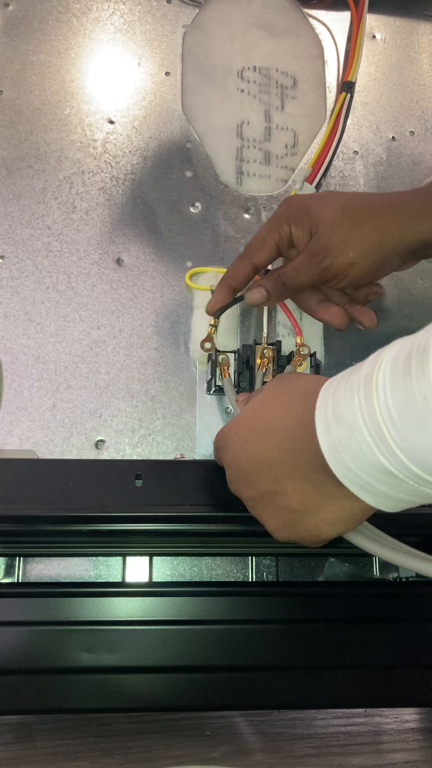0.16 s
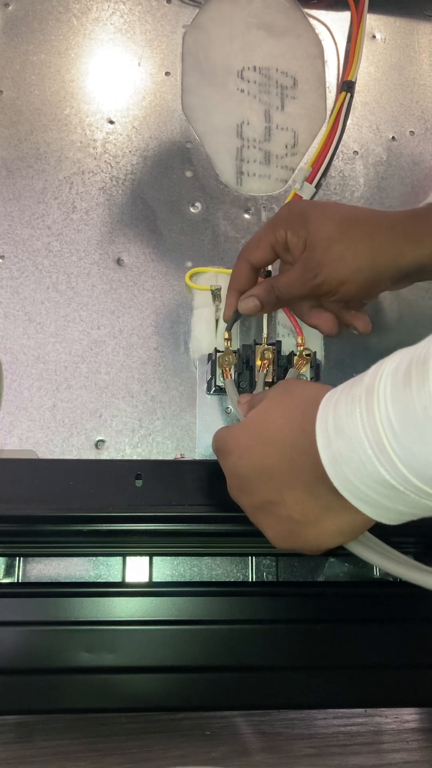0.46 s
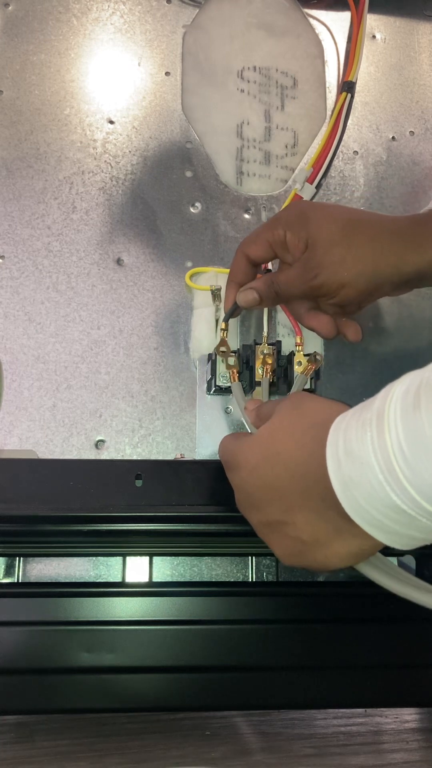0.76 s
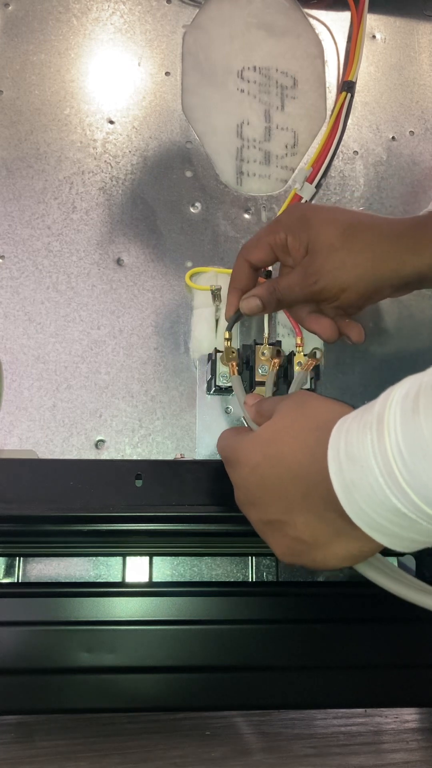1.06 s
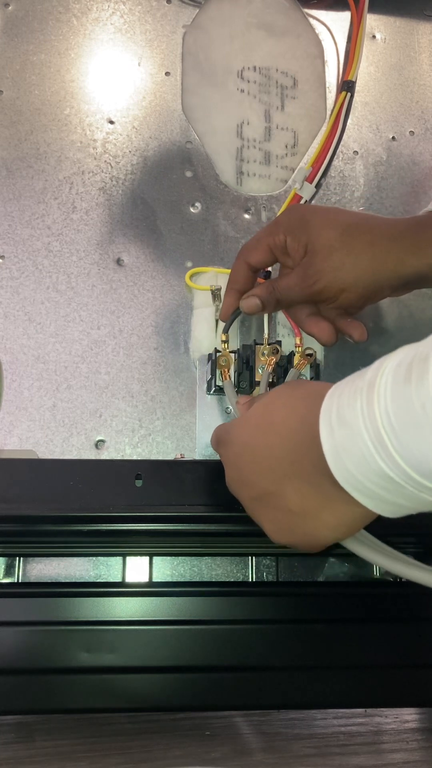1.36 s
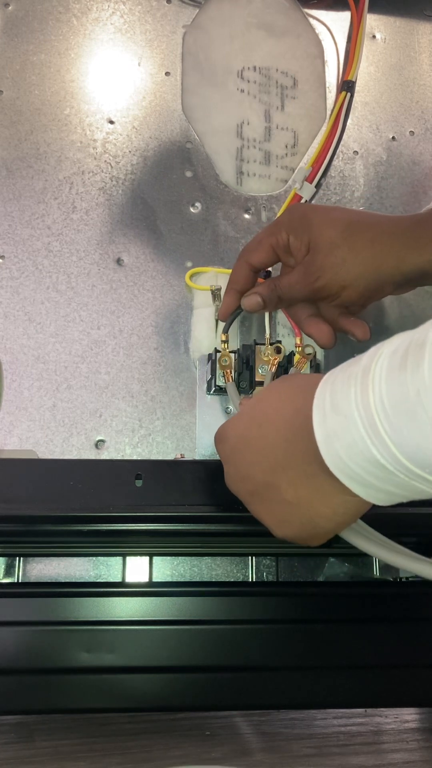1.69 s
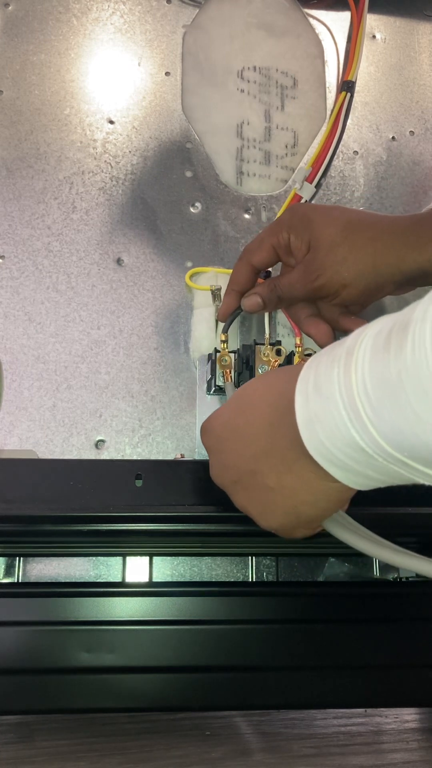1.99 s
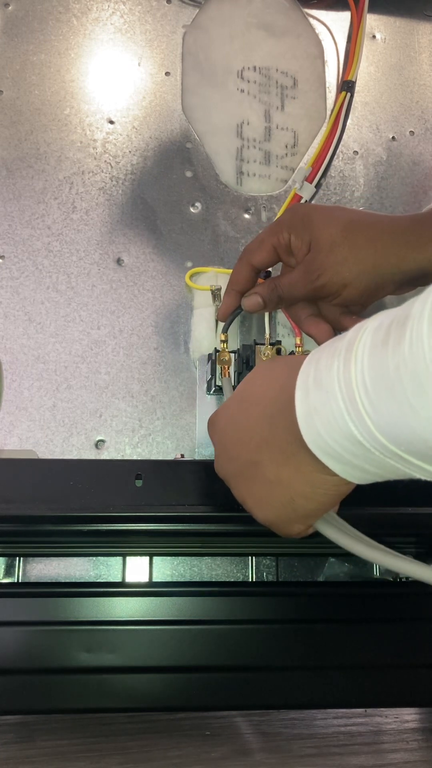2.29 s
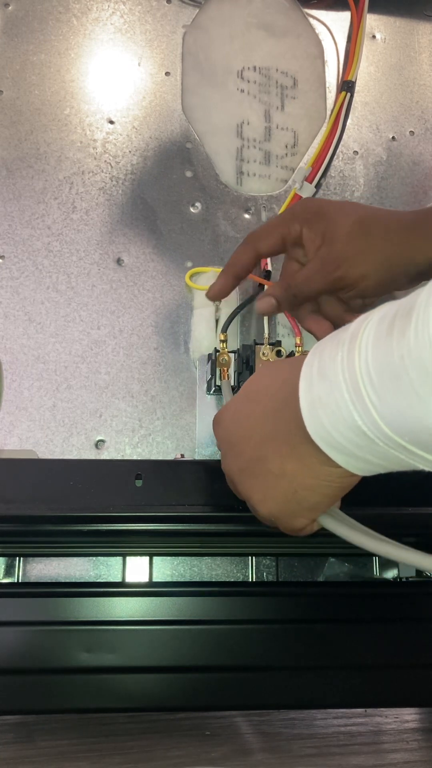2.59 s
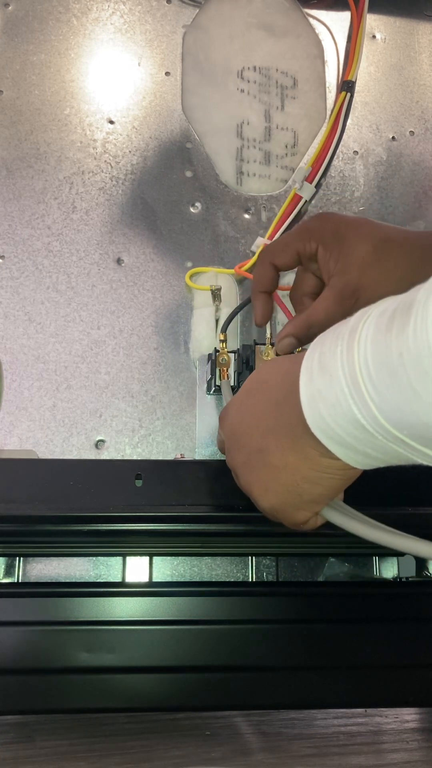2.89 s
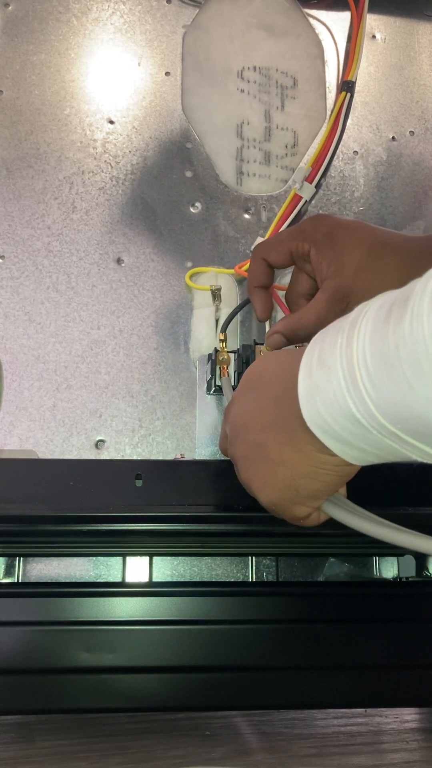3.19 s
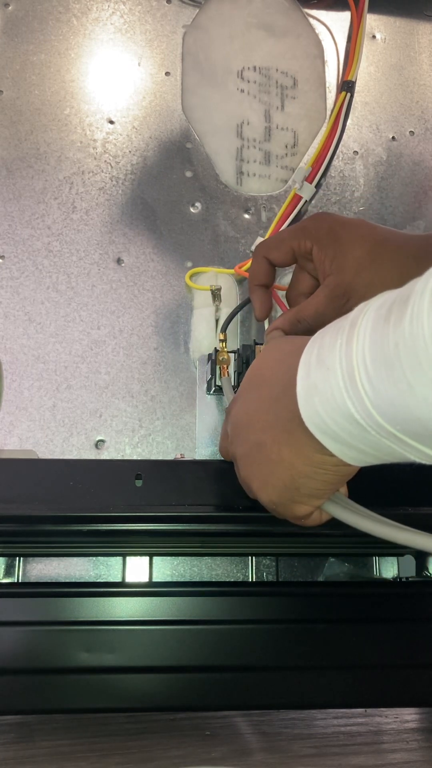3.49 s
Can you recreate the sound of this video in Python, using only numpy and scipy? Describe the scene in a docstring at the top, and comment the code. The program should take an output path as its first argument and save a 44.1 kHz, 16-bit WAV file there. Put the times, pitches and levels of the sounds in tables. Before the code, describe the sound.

Metal terminals click on an appliance's sheet-metal panel. A loud, bright rattling clack at 0.2 s carries a low thud and ringing reverberation. Lighter clicks follow near 0.55 and 0.6 s, small ticks and faint grainy scrapes from 0.8 to 2.5 s, two crisp clicks at 2.6 and 2.9 s, and a faint tick at 3.3 s. Low fan, motor and mains hum continues throughout the hard room, closely miked.

```python
"""Small metal terminals and screws click and tick on a sheet-metal appliance panel in a large hard room.
Throughout, shaft tones of a fan and a second motor, mains hum and shaped noise make a steady drone.
A rattling contact near 0.2 s is the loudest; a faint ringing swell, ticks and grainy swells follow.
Two bright clicks come near 2.6 and 2.9 s, then a faint tick at 3.3 s. Each blow rings decaying sines,
answered by noise-tail reflections and a beating back sheet; a close pair of microphone ports hears it."""
import sys
import numpy as np
from scipy import signal
from scipy.fft import rfft, irfft, next_fast_len
from scipy.io import wavfile
from scipy.ndimage import uniform_filter1d

SR = 44100
rng = np.random.default_rng(int(sys.argv[2]) if len(sys.argv) > 2 else 0)


def materialize(psi):
    """Save the field psi as 16-bit PCM at rate SR to the path in sys.argv[1].

    A 1-D psi becomes a single channel; in a 2-D psi each row is a channel.
    """
    bounded = np.clip(np.atleast_2d(psi).T, -1, 1)
    quanta = np.round(bounded * 32767).astype(np.int16)
    wavfile.write(sys.argv[1], SR, quanta)


N = 160965

RISE_S, THUD_RISE_S = 0.0002, 0.0015  # softness of the attack: clicks, knocks
ROOM_DELAY_S = 0.0054


def amp(db):
    """Decibels to linear gain."""
    return 10 ** (np.asarray(db) / 20)


def evened(x):
    """Scale a signal to an rms of 1."""
    return x / np.sqrt(np.mean(x ** 2) + 1e-20)


def read(points, hz, count=1):
    """Column number count of a table, joined on a log-frequency axis."""
    table = np.transpose(points)
    return np.interp(np.log(hz + 1), np.log(table[0] + 1), table[count])


def add(mix, s, sound):
    """Mix a sound in at s seconds, cut at the end of the mix."""
    part = mix[..., round(s * SR):][..., :sound.shape[-1]]
    part += sound[..., :part.shape[-1]]


def ring(modes, rise_s):
    """Struck metal: a sum of dying sines of alternate sign with a soft start, peak 1."""
    t = np.arange(SR // 4) / SR
    out = np.zeros(len(t))
    for k, (hz, db, t60) in enumerate(modes):
        out += (-1) ** k * amp(db - 60 * t / t60) * np.sin(2 * np.pi * hz * t)
    out = out * (1 - np.exp(-(t / rise_s) ** 2))
    return out / abs(out).max()


def snap(hz, width_hz):
    """One broad resonance: the wider it is, the quicker it dies."""
    return ring([(hz, 0, 2.3 / width_hz)], RISE_S)


def wash():
    """Steady air and machine noise: random short-time spectra with faint drifting patches."""
    # spectrum of the noise before levelling: (frequency [Hz], relative level [dB])
    spectrum = [(25, -50), (40, -33), (50, -13.5), (65, -3.5), (82, -25.5), (100, -28), (125, -12),
                (200, -7), (270, -19.5), (330, -21.5), (420, -30), (600, -33), (800, -40), (1300, -33.5),
                (1700, -40), (2200, -47), (3200, -50.5), (4200, -47.5), (4800, -58), (5100, -77),
                (5800, -79.5), (6300, -59), (7900, -52), (9500, -62.5), (10700, -73.5), (11300, -82),
                (16000, -97.5)]
    level_db, patch_db = -48.5, 1.8
    frames, hz = N // 512 + 5, np.fft.rfftfreq(2048, 1 / SR)
    a, b, c, d, patches = rng.standard_normal((frames, 1025, 5)).T
    patches = uniform_filter1d(patches, 16, 0)  # smooth across frequency
    patches = evened(uniform_filter1d(patches, 6, 1))  # smooth across time
    gain = amp(read(spectrum, hz)[:, None] + patch_db * patches)
    z = np.array([a + 1j * b, c + 1j * d]) * gain
    noise = signal.istft(z, nperseg=2048, noverlap=1536)[1][:, :N]
    return amp(level_db) * evened(noise)


def hum():
    """Shaft multiples of fan and motor and the mains tones, each wavering a little in level."""
    # fan tones: (multiple of the shaft rate, level [dB])
    fan = [(6, -48), (8, -53.5), (9, -84), (10, -60.5), (11, -61.5), (12, -69), (14, -52.5), (15, -52.5),
           (18, -57.5), (21, -70), (22, -73.5), (30, -62.5), (32, -74)]
    # second motor tones: (multiple of the shaft rate, level [dB])
    motor = [(4, -63), (5, -69), (8, -65.5), (9, -78), (12, -84), (17, -82), (20, -78.5), (28, -80.5)]
    # mains tones: (multiple of the mains frequency, level [dB])
    mains = [(1, -48), (2, -39)]
    fan_hz, motor_hz, mains_hz = 9.235, 45.17, 59.92
    waver_db, waver_hz = 1, 1.5  # per sine, at twice the mains frequency
    t, out = np.arange(N) / SR, np.zeros(N)
    for base_hz, rows in ((fan_hz, fan), (motor_hz, motor), (mains_hz, mains)):
        for multiple, db in rows:
            pace_draw, waver_phase, tone_phase = rng.random(3)
            pace = np.sqrt(multiple * base_hz / (2 * mains_hz))  # higher tones waver more and faster
            turns = waver_hz * pace * (.5 + pace_draw) * t + waver_phase
            swing = sum(np.sin(2 * np.pi * ratio * turns) for ratio in (1, 2.37))
            level = amp(db + waver_db * pace * swing)
            out += np.sqrt(2) * level * np.sin(2 * np.pi * (multiple * base_hz * t + tone_phase))
    return np.array([out, out])


def grainy_swells():
    """Dense tiny random grains through one resonance swell and fade in each stroke."""
    # strokes, the narrow one a faint late swell of ringing near 1740 Hz:
    # (time [s], length [s], level before the swell [dB], frequency [Hz], width [Hz])
    strokes = [(0.468, .2, -65, 1740, 50), (1.498, 0.087, -72.5, 1480, 500), (1.6, .27, -71.5, 3040, 700),
               (1.661, 0.18, -80, 4770, 300), (2.438, 0.23, -77, 3050, 500)]
    grains_per_s = 900
    out = np.zeros((2, N))
    for s, length, db, hz, width_hz in strokes:
        size = rng.standard_normal((2, SR // 2))
        starts = rng.random((2, SR // 2)) < grains_per_s / SR
        grains = signal.fftconvolve(size * starts, snap(hz, width_hz)[None], axes=1)
        grains = grains[:, :round(length * SR)]
        swell = np.sin(np.linspace(0, np.pi, grains.shape[1]))
        add(out, s, amp(db) * evened(grains) * swell)
    return out


def tail(seconds, delay_s, level_db, t60):
    """Reflections as two unrelated noise tails, each band dying at its own speed, energy about 1."""
    noise = rng.standard_normal((2, round(seconds * SR)))
    hz, t, z = signal.stft(noise, SR, nperseg=128)
    decay_db = level_db(hz)[:, None] - 60 * t / t60(hz)[:, None]
    out = signal.istft(z * amp(decay_db), SR, nperseg=128)[1]
    # silent for the delay, then fading in over the same time again
    out = out * np.clip(np.arange(out.shape[1]) / SR / delay_s - 1, 0, 1)
    return out / np.linalg.norm(out[0])


def sheet(count=8):
    """The large back sheet rings on after a blow; close partials beat, so its ring is uneven."""
    # modes, each a cluster of close partials: (frequency [Hz], level [dB], 60 dB decay time [s])
    sheet_modes = [(1405, -6.5, 1.1), (1563, -12.5, 2.6), (1710, -6.5, 0.32), (1879, -8.5, 0.97),
                   (2046, -4.5, 1.57), (2173, 1, 0.8), (2440, -0.5, 0.6), (2708, -6, 0.57),
                   (3030, -8.5, 0.91), (3080, -19, 1.3)]
    cluster_hz = 35.14  # standard deviation of the partials around their mode
    t, out = np.arange(2 * SR) / SR, 0
    for hz, db, t60 in sheet_modes:
        spread, phase = rng.standard_normal((2, count, 1)), rng.random((2, count, 1))
        partials = np.sin(2 * np.pi * ((hz + cluster_hz * spread) * t + phase))
        out = out + amp(db - 60 * t / t60) * partials.sum(1)
    return out * np.minimum(t / ROOM_DELAY_S, 1) / np.sqrt(count * len(sheet_modes))


def click(level_db, bright_hz, ring_db, panel_db, bracket_db, air_db, rattle_s):
    """A first contact and a dying rattle of bounces ring terminal, bracket and panel."""
    # ringing of the terminals: (frequency [Hz], level [dB], 60 dB decay time [s])
    terminal_modes = [(6490, -7, .01), (6610, 4.5, 0.0056), (7477, 1.5, 0.0096), (8040, -4, .01),
                      (8083, 3, 0.0097), (8520, -10.5, 0.012), (9260, 7.5, .01), (9450, -5, 0.0093),
                      (9984, -6.5, 0.01806), (10283, -16, .012)]
    # ringing of the bracket: (frequency [Hz], level [dB], 60 dB decay time [s])
    bracket_modes = [(2950, -2, .007), (3350, -2, .008), (3900, -3, .007), (4450, -1, .009),
                     (4800, -6, .006)]
    # ringing of the panel: (frequency [Hz], level [dB], 60 dB decay time [s])
    panel_modes = [(1350, -7, .01), (1560, -6, .01), (1760, -4, .02), (1950, -2, .01), (2130, -2, .01),
                   (2300, -1, .012), (2520, -1, .012), (2680, -3, .01)]
    bounce_db, bounces_per_s = 7, 2900
    size = 4096
    t = np.arange(size) / SR
    force = rng.uniform(-1.7, 1, size)
    bounces = rng.random(size) < bounces_per_s / SR
    hits = amp(bounce_db) * force * bounces * np.exp(-t / max(rattle_s, 1e-4))
    hits[0] = 1  # first contact
    body = snap(bright_hz, 920)
    body = body + amp(ring_db) * ring(terminal_modes, RISE_S)
    body = body + amp(bracket_db) * ring(bracket_modes, RISE_S)
    body = body + amp(air_db) * snap(13400, 2700)
    body = body + amp(panel_db) * ring(panel_modes, RISE_S)
    rattled = signal.fftconvolve(hits / np.linalg.norm(hits), body)[:len(body)]
    return amp(level_db) * rattled, amp(level_db) * body


def terminals():
    """Clicks and knocks excite near reflections; the room hears each contact as one even blow."""
    # metal on metal: (time [s], level [dB], brightest frequency [Hz], terminal ring [dB], panel [dB],
    # bracket [dB], air [dB], rattle decay [s]); the ring levels are relative to the brightest resonance
    clicks = [(0.06, -42.5, 8400, -2.5, -8, -4.5, -37.5, 0.011),
              (.130, -62.5, 9900, -20, -29.5, -29, -27.5, 0.0012),
              (0.1886, -26, 9100, -12, -9, -16, -20.5, .004),
              (0.1993, -6, 9230, -11.5, -24, -22, -14, 0.0005),
              (.2012, -16.5, 8630, 4.5, -5.5, -4.5, -13, 0.006),
              (0.5466, -33, 8500, -7.5, -23, -10.5, 3.5, 0.0021),
              (0.5926, -33.5, 8600, -8, -36.5, -9, -39.5, 0.0033),
              (0.795, -53.5, 3050, -13, -41.5, -30.5, -34.5, 0.0021),
              (0.854, -49, 6500, -6, -31.5, -14, -20, 0.0024),
              (0.8606, -42.5, 3930, -8, -41.5, -17.5, -15, 0.0045),
              (0.932, -49, 8700, -13, -40.5, -24, -36, 0.006),
              (0.959, -43, 3860, -7.5, -28.5, -16, -27, 0.011),
              (0.979, -42, 9700, -3, -26, -25, -22, 0.006),
              (0.9827, -30.5, 8530, -15, -17, -18.5, -37, 0.0022),
              (1.0944, -47.5, 8300, -2, -32.5, -6.5, -36, 0.0029),
              (1.135, -48, 8500, -5.5, -33.5, -11.5, -29, 0.0047),
              (1.157, -43, 7950, -19, -30, -14.5, -44, 0.0014),
              (1.278, -37, 6280, -5.5, -10.5, -6, -18, 0.0055),
              (1.4174, -46, 6500, -17, -47, -12.5, -12, 0.0035),
              (1.673, -59, 6740, -4, -19, 2.5, -43.5, 0.039),
              (1.719, -54.5, 8800, -9.5, -23, -2, -43, 0.058),
              (1.7486, -44.5, 6950, 0, -3.5, -1.5, -20, 0.0087),
              (2.024, -53.5, 8500, -7, -22.5, -11.5, -48, 0.039),
              (2.2555, -47.5, 6540, -3.5, -3, 0, -36.5, 0.0013),
              (2.294, -50, 6500, -0.5, -11, -8, -35, 0.024),
              (2.512, -56, 6660, -12.5, -15, 0.5, -26, 0.011),
              (2.619, -25, 8480, -6, -50.5, -17, -15, 0.0033), (2.8372, -46, 8200, -9, -4, -5, -14, 0.004),
              (2.864, -26, 8050, -4, -52, -17, -11, 0.0041), (3.29, -54, 9020, -17, -20.5, -25, -30, 0.022)]
    # knocks on the cabinet and pings of single parts:
    # (time [s], level [dB], frequency [Hz], 60 dB decay time [s])
    knocks = [(.064, -51, 550, .04), (.202, -31, 138, .14), (.2, -45, 373, .025), (.2, -45, 620, .018),
              (.2, -46, 900, .015), (.218, -38, 2200, .04), (.798, -53, 2970, .02),
              (2.257, -54.5, 563, .04), (2.619, -46, 4380, .009), (2.619, -47, 3130, .006),
              (2.837, -44, 295, .02), (2.837, -49, 850, .012), (2.837, -50, 1690, .015),
              (2.864, -48, 4400, .007)]
    # room tail: (frequency [Hz], relative level [dB], 60 dB decay time [s])
    room = [(298.8, -3, 0.53), (1282, -1, 2.27), (2258, 6, 1.78), (3130, 2.5, 0.93), (4334, 2, 1.3),
            (5000, -9, 2.6), (6264, -1.5, 1.16), (9100, -4, 0.87), (11400, -5, 0.88), (11500, -28, 0.76),
            (16740, -39.5, .5)]
    # colour of the contacts from the ports cancelling in the centre: (frequency [Hz], level [dB])
    centre = [(4900, 0), (5350, -4), (5900, 4), (6300, 3.5), (10800, 1), (11600, -14.5), (13500, -2)]
    near_db, room_db, sheet_db = -6.5, -7, -15
    near_t60_s, near_delay_s = 0.017, 0.0016  # reflections off the cabinet
    near_top_hz, near_above_db = 11220, -32  # the near tail is much weaker above near_top_hz

    dry, blows, pushes = np.zeros(N), np.zeros(N), np.zeros(N)
    for s, level_db, bright_hz, ring_db, panel_db, *rest in clicks:
        rattled, plain = click(level_db, bright_hz, ring_db, panel_db, *rest)
        add(dry, s, rattled)
        add(blows, s, plain)
        add(pushes, s, amp([level_db + panel_db]))  # impulse into the back sheet
    for s, db, hz, t60 in knocks:
        knock = amp(db) * ring([(hz, 0, t60)], THUD_RISE_S)
        add(dry, s, knock)
        add(blows, s, knock)

    near = tail(.1, near_delay_s, lambda hz: near_above_db * (hz > near_top_hz),
                lambda hz: near_t60_s + 0 * hz)
    far = tail(3, ROOM_DELAY_S, lambda hz: read(room, hz), lambda hz: read(room, hz, count=2))
    out = np.array([dry, dry])
    for db, taps, source in ((near_db, near, dry), (room_db, far, blows), (sheet_db, sheet(), pushes)):
        out = out + amp(db) * signal.fftconvolve(source[None], taps, axes=1)[:, :N]
    colour = amp(read(centre, np.fft.rfftfreq(N, 1 / SR)))
    return irfft(rfft(out) * colour, N)


def ports(field):
    """Microphone pair: mid is the first field; side mixes it, phase-shifted, with the second."""
    # side against mid: (frequency [Hz], side level [dB], likeness [0-1], phase [rad])
    pair = [(40, -11.5, 0.96, 0.64), (120, -6, 1, 0.36), (248, -4.5, 0.99, 0.16), (335.4, 3, 0.94, -0.15),
            (457, 12, 0.1, -0.65), (640, 14.5, 0.16, -1.5), (1223, 4.5, 0.3, -1.6), (2300, 2, 0.7, -1.85),
            (3920, 1.5, 0.97, -1.4), (4530, 5, 0, -2.4), (5223, 21.5, 0.13, -1), (6610, 4.5, 0.86, -1.6),
            (6990, -14, 0.2, -1.6), (7715, -1, 0.04, -2.1), (8060, -20.5, .4, 1.1), (9900, -16, 0.8, 1.7),
            (10100, -4, 1, 1.8), (11700, 23, 0, 0.77), (12800, 4.5, 1, 1.85), (14500, -26.5, .3, 1.6)]
    margin = SR // 4  # mirrored ends for the long transform
    size = next_fast_len(N + 2 * margin)
    padded = np.pad(field, ((0, 0), (margin, size - N - margin)), "reflect")
    hz = np.fft.rfftfreq(size, 1 / SR)
    mid, other = rfft(padded)
    like = np.clip(read(pair, hz, count=2), 0, 1)
    turn = np.exp(1j * read(pair, hz, count=3))
    side = amp(read(pair, hz)) * turn * (like * mid + np.sqrt(1 - like ** 2) * other)
    return irfft(np.array([mid + side, mid - side]), size)[:, margin:margin + N]


def scene():
    """Drone, grainy swells and contacts together at the microphone ports."""
    return ports(wash() + hum() + grainy_swells() + terminals())


def record(dry):
    """The band limit: a steep low-pass filter at 16.3 kHz."""
    taps = signal.firwin(511, 16300, window=("kaiser", 9), fs=SR)
    return signal.oaconvolve(dry, taps[None], "same")


dry = scene()
out = record(dry)
materialize(out)
```